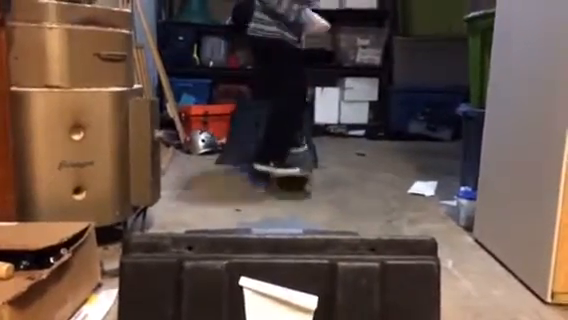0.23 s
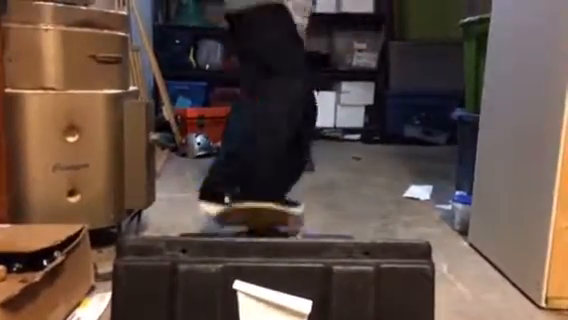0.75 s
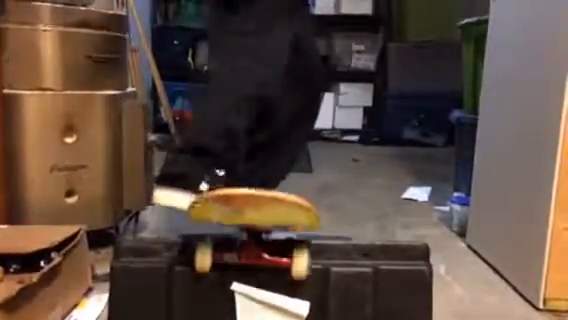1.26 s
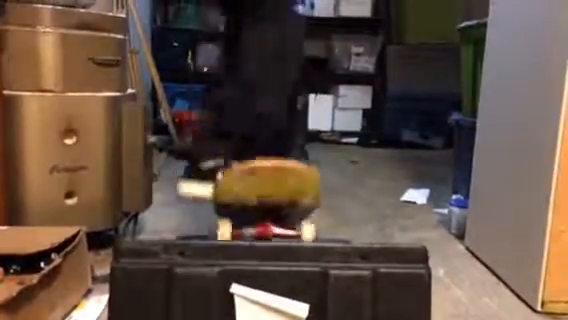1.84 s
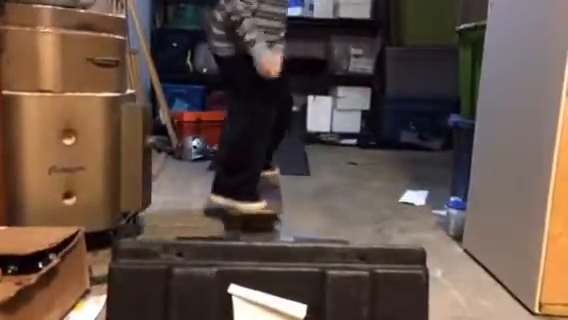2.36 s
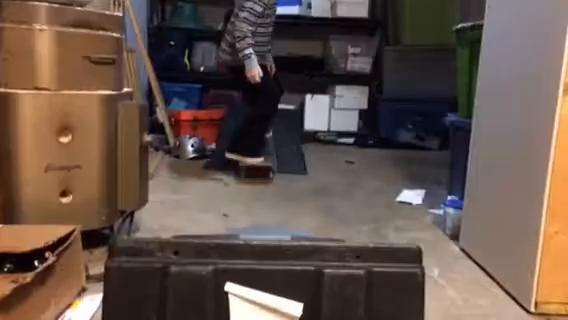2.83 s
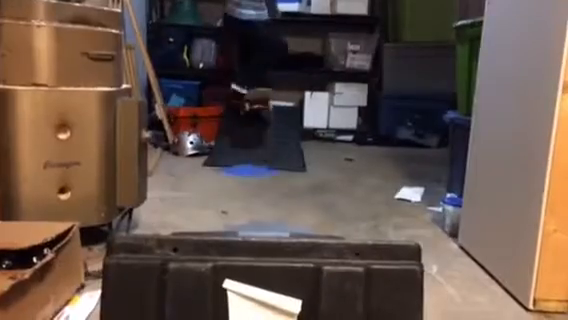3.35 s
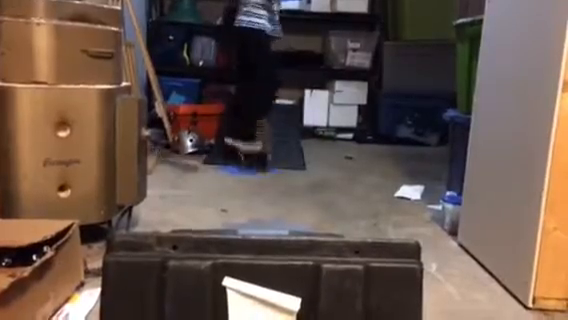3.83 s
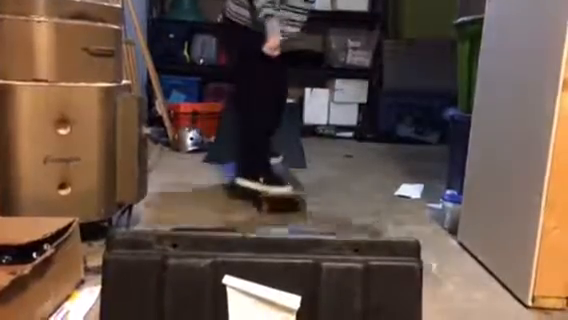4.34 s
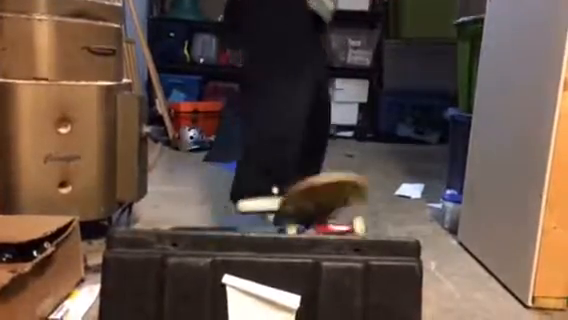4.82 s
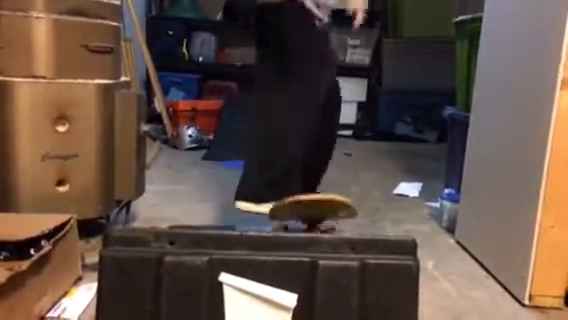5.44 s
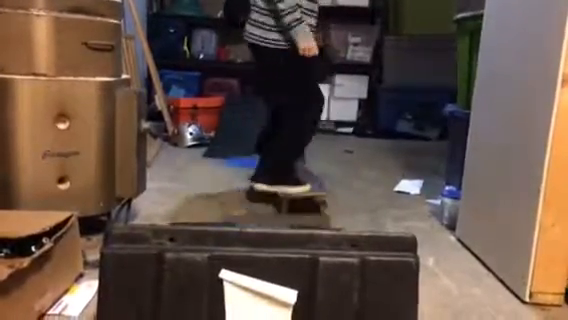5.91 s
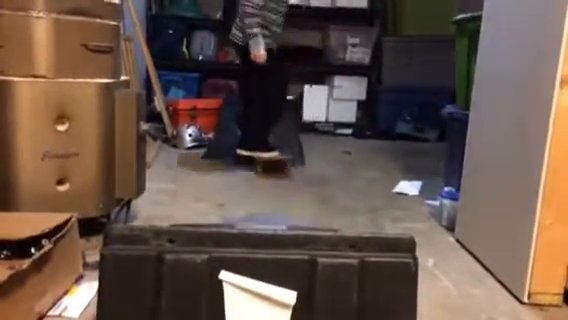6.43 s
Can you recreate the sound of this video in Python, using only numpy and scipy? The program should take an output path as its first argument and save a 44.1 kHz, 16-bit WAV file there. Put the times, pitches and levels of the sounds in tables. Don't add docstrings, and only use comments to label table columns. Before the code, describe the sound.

A skateboard rumbles across a concrete storeroom floor, clacking sharply and booming on a hollow plastic ramp close by, with gritty shoe scuffs between.

```python
import sys
import numpy as np
from scipy import signal
from scipy.io import wavfile
from scipy.ndimage import uniform_filter1d

SR = 44100
rng = np.random.default_rng(int(sys.argv[2]) if len(sys.argv) > 2 else 0)


def gain_from_db(level_db):
    decades = np.asarray(level_db, float) / 20
    return 10 ** decades


def pcm_store(signal):
    levels = np.round(np.clip(np.atleast_2d(signal), -1, 1) * 32767)
    wavfile.write(sys.argv[1], SR, levels.astype(np.int16).T)


N = 294147

# [t/s, level/dB]
AIR = [(0, -68.5), (.5, -70), (1.12, -75), (1.46, -65), (1.53, -84), (1.6, -77), (1.7, -66), (2.15, -75),
       (2.66, -71), (3.3, -67), (3.82, -73), (4.45, -72), (5.05, -72), (5.55, -68), (6.67, -64)]
# [from t/s, to t/s, deck rumble level/dB, floor shake relative level/dB]
LOADS = [(0, 0.193, -29.5, -6.5), (.4, .63, -52, -7), (0.745, 0.985, -28.5, -1), (1.144, 1.235, -37.5, 4),
         (1.42, 1.514, -51.5, -2), (1.842, 1.997, -32.5, 5), (2.047, 2.403, -26.5, -5.5),
         (2.553, 2.8, -46.5, -19), (2.988, 3.083, -26.5, -5), (3.12, 3.273, -49, 6),
         (3.806, 4.185, -39.5, -7), (4.53, 4.66, -39.5, -28), (4.74, 4.807, -22.5, -5),
         (4.856, 4.91, -31.5, 1), (5.531, 5.596, -34.5, 11.5), (5.65, 5.834, -35, 2),
         (6.1, 6.366, -50.5, -26), (6.526, 6.667, -44, -14)]
LOAD_RISE_DB_S, LOAD_FALL_DB_S, SHAKE_REST_DB = 173, 108, -65
# [t/s, level/dB]
WHEEL_RUN = [(0, -35.5), (.35, -46.5), (.8, -33.5), (1.22, -55.5), (1.45, -78), (1.62, -65), (1.72, -56),
             (2.36, -36), (2.53, -61), (2.79, -30.5), (3.07, -45), (3.4, -76), (4.14, -39), (4.35, -47),
             (4.79, -35), (5.3, -74), (5.75, -34), (6.08, -46), (6.67, -48.5)]
# [f/Hz, width/Hz, level/dB]
FLOOR_MODES = [(61, 130, -4.5), (94.3, 19.4, -1)]
# [f/Hz, width/Hz, level/dB]
HOLLOW_MODES = [(113, 27.5, -2), (148.7, 15, 2.5), (207.4, 54.5, -2), (238.4, 48, -2), (311.7, 51, -3)]
# [f/Hz, width/Hz, level/dB]
WHEEL_MODES = [(301, 107, 0), (513, 50, 9), (610.4, 33, 10), (748, 46, 9), (945, 96, 3.5),
               (1175, 236, -0.5), (1740, 490, -8)]
# [from t/s, to t/s, level/dB]
SCUFFS = [(0, 0.032, -44), (0.174, 0.36, -52.5), (0.628, 0.66, -40), (0.85, 0.88, -45),
          (0.91, 0.925, -47.5), (0.946, 0.97, -43), (1.37, 1.4, -46), (1.42, 1.448, -51),
          (1.698, 1.713, -39.5), (1.943, 2.03, -53), (2.336, 2.6, -58), (2.72, 2.94, -56),
          (2.97, 3.2, -48.5), (3.362, 3.41, -48.5), (3.458, 3.59, -42.5), (3.685, 3.71, -53),
          (3.94, 3.3, -59), (3.986, 4.382, -48.5), (4.543, 4.75, -46), (4.841, 4.92, -39.5),
          (5.238, 5.43, -44.5), (5.659, 5.77, -37.5), (5.856, 6.01, -55), (6.09, 6.275, -46.5),
          (6.32, 6.35, -51.5), (6.63, 6.9, -43.5)]
SCUFF_RISE_DB_S, SCUFF_FALL_DB_S, BEARING_DB = 291, 267, -29
# [f/Hz, width/Hz, level/dB]
GRIT_BANDS = [(1800, 1470, 5), (2470, 210, 4), (3100, 370, 3), (3950, 810, 2.5), (5460, 1000, 0),
              (6060, 1400, -4.5), (8000, 2500, -26), (11800, 3600, -14.5)]
# [t/s, peak level/dB, f/Hz]
FLOOR_BOOMS = [(0.001, -18.5, 163.5), (0.102, -20, 138.4), (0.13, -16.5, 137.6), (0.281, -21.5, 148.5),
               (0.569, -30, 155), (2.817, -11.5, 137), (2.964, -30, 114), (3.033, -9, 136.7),
               (3.455, -15.5, 149.7), (3.519, -17, 84), (3.701, -31.5, 127), (3.812, -27, 116),
               (3.916, -28, 127), (3.988, -8.5, 132.4), (4.099, -29, 143), (4.19, -23, 149),
               (4.292, -34.5, 131), (4.487, -42, 149), (5.995, -32.5, 149), (6.421, -13.5, 138),
               (6.615, -24.5, 116)]
# [t/s, peak level/dB, f/Hz]
RAMP_BOOMS = [(0.652, -11, 139.7), (0.831, -12.5, 151.4), (0.868, -13.5, 146), (1.041, -20, 155.7),
              (1.07, -15.5, 112.7), (1.213, -14, 89), (1.244, -10.5, 90.7), (1.28, -6.5, 82),
              (1.304, -8, 161), (1.651, -4, 141), (1.777, -20, 92), (1.841, -13, 175.5), (1.874, -9, 151.4),
              (1.963, -10.5, 111.6), (2.12, -20, 129), (2.261, -22.5, 89.4), (2.432, -13.5, 137.3),
              (4.62, -9, 118), (4.744, -44, 156), (4.822, -14, 124.3), (5.107, -13, 99.5),
              (5.18, -12.5, 73.3), (5.471, -30, 109), (5.51, -31, 79.4), (5.585, -19, 82),
              (5.645, -18.5, 80), (5.914, -20.5, 95)]
BOOM_FADE_S, SOFTER_LONGER = 0.036, 0.12
# [t/s, crack peak level/dB, deck knock relative level/dB, bright tick relative level/dB, hardness/dB]
CLACKS = [(0.0014, -21, 1.5, -27, 7.5), (0.1298, -16, -4, -6.5, -3.5), (0.2919, -12.5, -7.5, -6.5, 3.5),
          (0.652, -15, 8.5, -17, 4), (0.826, -15.5, 8, -15, 0.5), (1.1976, -15.5, 0.5, -12, -6.5),
          (1.275, -14.5, -1.5, -10.5, 2.5), (1.6442, -10.5, -3, -7, 7), (1.8434, -15, -3, -8.5, 4),
          (1.966, -25.5, 2, -5.5, 8.5), (2.269, -12.5, -0.5, -12, 2), (2.45, -9, -2, -11, 2),
          (2.8095, -10.5, -3, -4, 3), (3.0311, -19, -11, 2, 7.5), (3.059, -19.5, -5, -3, 4),
          (3.4499, -4.5, -12, -21, 2.5), (3.985, -3.5, -6.5, -5.5, 3.5), (4.1898, -8, -6, -10.5, -6),
          (4.6193, -13, 5, -21, 0), (4.822, -18.5, 5.5, 0, 2.5), (5.0976, -22.5, 2.5, -10.5, 3),
          (5.1747, -23.5, -2, -3.5, 6.5), (5.6872, -18, 2, -9.5, 4.5), (6.4124, -13.5, 1, -6.5, -7.5)]
# [t/s, crack peak level/dB, deck knock relative level/dB, bright tick relative level/dB]
TAPS = [(0.1174, -17, 0.5, -6.5), (0.2623, -28, 6, -12), (0.278, -25.5, 5, -8), (1.0333, -29, 4, -15),
        (1.066, -29, 3, -16), (0.812, -32, 0, -2), (1.1765, -22, -5, 0.5), (1.2486, -25, 11, 3.5),
        (1.8365, -14.5, -2, -2), (1.9492, -21.5, -30, -26), (2.2394, -24, 11, -13), (2.4189, -24, 5, -13),
        (2.7556, -27.5, 5, -14), (2.966, -38, 10, -3), (3.0184, -17, 4.5, -13), (3.2829, -34.5, -12, -7),
        (3.537, -35, 10.5, -17), (3.425, -26.5, -11, -1), (3.677, -45.5, -13, 10), (3.7025, -40.5, 0, -2),
        (3.9779, -29, 3, -8), (4.3024, -19.5, -1, -17), (4.633, -25.5, -14, 9), (4.791, -26.5, 16.5, -15),
        (4.232, -24.5, -8, -7), (4.33, -30, -1, -12), (4.815, -27, 5, -8), (5.4455, -50, 13, -15),
        (5.9239, -26.5, 7.5, -8), (5.9452, -12.5, -5.5, -8.5), (5.957, -21.5, -9, -1), (6.0, -26, -12, -10),
        (6.3664, -31, -1, -15)]
FLICKS = [
    (1.0315, -28.5, 0, -1),
    (1.043, -30.5, 3, 0),
    (1.0624, -28, 1, 0),
    (1.7804, -24, -8, -5),
    (5.1474, -27, -9, -1),
    (3.934, -48, 0, 6),
    (3.5, -49, 0, 1),
    (3.492, -27, 0, 4),
]
CLACK_T60_S, TAP_T60_S, FLICK_T60_S = 0.23, 0.17, 0.067
TAP_HARD_DB, FLICK_HARD_DB = -3.5, 0
# [f/Hz, width/Hz, level/dB]
DECK_MODES = [(371, 155, -2), (519.6, 69, 2.5), (539, 34.6, 2.5), (700, 113, 4.5), (754, 305, 1.5),
              (980, 338, -3)]
# [f/Hz, width/Hz, level/dB]
TRUCK_MODES = [(1059, 69, 7), (1310, 210, 8), (1566, 253, 8.5), (1937, 480, 3.5), (2317, 60, 7.5),
               (2670, 730, -2.5), (3100, 130, -26), (3500, 230, -17)]
# [f/Hz, width/Hz, level/dB]
TICK_MODES = [(4200, 2920, 1.5), (8000, 15000, -5.5), (13600, 2860, -3)]
# [t/s, peak level/dB, f/Hz, fade/s]
SNAPS = [(0.1287, -36, 8790, 0.002), (0.1314, -18, 1530, 0.0022), (0.2931, -10, 1305, 0.002),
         (0.2938, -21, 8800, 0.002), (0.6525, -9, 950, 0.0022), (0.682, -20, 950, 0.002),
         (0.828, -9.5, 1190, 0.0026), (1.1969, -30, 11970, 0.002), (1.199, -16, 1380, 0.0022),
         (1.2738, -34, 6890, 0.002), (1.277, -11, 930, 0.0018), (1.6453, -35, 11630, 0.002),
         (1.651, -15, 3000, 0.0031), (1.658, -14, 1710, 0.002), (1.8434, -26, 7040, 0.002),
         (1.8444, -16, 2150, 0.002), (1.8548, -17.5, 3790, 0.0022), (2.2412, -15.5, 1120, 0.0022),
         (2.2483, -14, 960, 0.0022), (2.271, -14, 1380, 0.0021), (2.4498, -22, 7150, 0.0022),
         (2.4546, -23, 1120, 0.0017), (2.8131, -14, 3820, 0.002), (2.814, -29, 10250, 0.002),
         (2.8203, -35, 9730, 0.002), (3.0321, -12, 3770, 0.0022), (3.0326, -36, 11200, 0.002),
         (3.0622, -18, 4480, 0.002), (3.4498, -16, 4740, 0.002), (3.4498, -10, 1670, 0.0018),
         (3.4502, -35, 10680, 0.002), (3.9845, -28, 10770, 0.002), (3.986, -9, 1920, 0.002),
         (3.9955, -9, 1380, 0.002), (4.1906, -19, 1890, 0.002), (4.3042, -24, 1890, 0.002),
         (4.634, -16, 6030, 0.0024), (4.6382, -13, 960, 0.002), (4.6407, -22, 7300, 0.0023),
         (4.8226, -18, 5940, 0.0025), (4.822, -21, 1030, 0.002), (4.828, -17, 6940, 0.0022),
         (5.1745, -32, 11710, 0.002), (5.176, -20, 1210, 0.002), (5.1759, -30, 5300, 0.002),
         (5.6961, -15, 945, 0.002), (5.9455, -13, 1260, 0.0023), (5.9559, -29, 12100, 0.0022),
         (5.9597, -12, 1380, 0.0022), (6.416, -19.5, 4600, 0.0023)]
SNAP_CYCLES = 7
# [t/s, peak level/dB, f/Hz, fade/s]
PLIES = [(1.29, -19.5, 400, 0.023), (1.325, -28, 350, 0.013), (2.457, -21.5, 560, .03),
         (4.5, -37, 190, 0.056), (4.555, -31, 200, 0.059), (4.7925, -15, 620, .003),
         (5.22, -28.5, 301, .018), (3.453, -21.5, 2900, .012), (3.47, -24, 3140, .01),
         (4.194, -25.5, 2350, .014), (4.24, -32, 2590, .012), (4.304, -32, 2160, 0.011),
         (5.99, -31, 1900, .015), (5.975, -27, 1480, 0.021), (5.95, -24, 1230, .025),
         (5.957, -34, 3710, 0.016)]
# [t/s, peak level/dB, f/Hz, fade/s]
RINGS = [(0.13, -27, 1054, 0.024), (0.292, -11.5, 642, 0.023), (0.651, -15.5, 463, 0.041),
         (0.826, -27, 421, 0.044), (1.198, -30, 544, 0.053), (1.271, -8, 726, 0.012),
         (1.644, -19, 690, 0.0085), (1.842, -7.5, 406, 0.013), (2.269, -16.5, 461, 0.049),
         (2.454, -10.5, 956, 0.016), (2.812, -14, 560, 0.032), (3.032, -16, 700, 0.027),
         (3.987, -29, 1120, 0.014), (4.197, -10.5, 730, 0.022), (4.301, -23, 873, 0.017),
         (4.62, -14, 448, 0.016), (4.821, -2.5, 451, 0.012), (5.174, -10.5, 952, 0.0069),
         (5.687, -13, 463, 0.0098),
         (0.2922, -11, 1300, 0.019), (1.1987, -22, 1294, 0.018) , (1.6437, -18, 1745, 0.029),
          (2.4514, -18, 1370, 0.035), (3.4496, -26, 1584, 0.03), (3.9833, -21, 1650, 0.03),
          (4.1904, -16, 1870, 0.018), (5.9454, -19, 1300, 0.015), (3.458, -17, 2500, 0.01),
          (4.215, -22, 745, .04), (6.414, -36, 5500, .008), (2.125, -17, 370, 0.034),
          (4.303, -26, 800, .025)]
# [t/s, peak level/dB, f/Hz, fade/s]
THUMPS = [(0.651, -7, 285, 0.036), (0.688, -2.5, 223, 0.007), (0.804, -7.5, 255, 0.021),
          (0.834, -4.5, 240.6, 0.025), (1.216, -7, 228.4, 0.021), (1.274, -4, 201, 0.027),
          (1.648, -4.5, 232, 0.007), (1.842, -4.5, 189, 0.03), (2.049, -20.5, 223, 0.042),
          (2.12, -15.5, 226.6, 0.035), (2.223, -14, 193, 0.014), (2.248, -5, 225, 0.012),
          (2.273, 0, 264.5, 0.012), (2.294, -6.5, 240, 0.019), (2.341, -4, 228, 0.013),
          (2.454, -11.5, 346, 0.018), (2.816, -14.5, 310.3, 0.05), (3.033, -12.5, 320, 0.042),
          (3.182, -28, 401, 0.019),
          (3.526, -19, 225, 0.021), (3.988, -11, 310, 0.037), (4.035, -18.5, 285, 0.037),
                (4.622, -9, 435, 0.03), (4.639, -2, 269, 0.018), (4.791, -16, 265, 0.023),
                (4.821, -6, 206.7, 0.027), (5.103, -17, 210, 0.033), (5.182, -14, 190, 0.025),
                (5.548, -20, 323, 0.013), (5.58, -16.5, 220, 0.034), (5.662, -9.5, 279.7, 0.019),
                (5.688, -8, 273, 0.015), (5.846, -16, 274, 0.074), (5.918, -11.5, 326, 0.025),
                (6.451, -17.5, 195.6, 0.03)]
# [from t/s, to t/s, level/dB, f/Hz]
SPINS = [(1.365, 1.4, -59, 2340), (1.36, 1.46, -58, 3000), (1.1, 1.46, -57, 3700), (3.4, 3.42, -53, 2000),
         (3.56, 3.58, -54, 7000), (4.5, 4.55, -58, 4000), (4.87, 4.97, -55, 2280), (4.87, 4.97, -54, 3000),
         (5.27, 5.43, -55.5, 1880), (5.24, 5.34, -56, 2830), (5.3, 5.45, -51, 3940),
         (5.26, 5.36, -53, 5140), (5.26, 5.37, -55, 5300), (5.25, 5.37, -54, 6090), (6.09, 6.12, -54, 5000),
         (6.1, 6.26, -53.5, 4090), (6.12, 6.2, -53, 4450), (6.1, 6.26, -56, 3470), (6.2, 6.27, -56, 2350),
         (6.2, 6.26, -65, 6230)]
SPIN_WIDTH_HZ, SPIN_EDGE_DB_S = 140, 450


def body(x, modes):
    out = 0
    for k, (hz, width, db) in enumerate(modes):
        b, a = signal.iirpeak(hz, hz / max(width, 5.), fs=SR)
        out = out + (-1) ** k * gain_from_db(db) * signal.lfilter(b, a, x)
    return out


def unit(x):
    return x / np.sqrt(np.mean(x ** 2))


def walk(rate):
    k = int(SR / rate)
    held = np.repeat(rng.standard_normal(N // k + 1), k)
    return uniform_filter1d(uniform_filter1d(held, k), k)[:N]


def add(out, s, x):
    i = max(int(s * SR), 0)
    out[i:i + len(x)] += x[:N - i]


def level_line(table):
    return np.interp(np.arange(N) / SR, *np.transpose(table))


def spells(start, end, db, rise, fall):
    t = np.arange(0, N / SR + .01, .002)[:, None]
    slopes = rise * np.maximum(start - t, 0) + fall * np.maximum(t - end, 0)
    top = np.max(db - slopes, axis=1)
    return gain_from_db(np.interp(np.arange(N) / SR, t[:, 0], top))


def grains(rate, spread_db, smooth):
    hit = rng.random(N) < rate / SR
    size = gain_from_db(spread_db * np.minimum(rng.exponential(size=N), 3.5))
    return unit(hit * size * rng.standard_normal(N)) + smooth * rng.standard_normal(N)


def hush():
    return gain_from_db(-66) * unit(body(rng.standard_normal(N), [(150, 100, -3.5), (1260, 380, -1)]))


def air():
    hiss = unit(body(rng.standard_normal(N), [(4000, 5000, -2), (12000, 10000, 0)]))
    return hiss * gain_from_db(level_line(AIR) + 1.4 * walk(25))


def wheel_run():
    return gain_from_db(level_line(WHEEL_RUN))


def rolling():
    start, end, db, shake = np.transpose(LOADS)
    flicker = [gain_from_db(2.5 * walk(25)) for _ in range(3)]
    floor_load = spells(start, end, db + shake, LOAD_RISE_DB_S, LOAD_FALL_DB_S) + gain_from_db(SHAKE_REST_DB)
    deck_load = spells(start, end, db, LOAD_RISE_DB_S, LOAD_FALL_DB_S)
    floor = body(body(grains(80, 1.0, 0.79), FLOOR_MODES), [(73, 160, 0)])
    deck = body(body(grains(150, 3.9, 0.93), HOLLOW_MODES), HOLLOW_MODES)
    wheels = body(body(grains(900, 2, .9), WHEEL_MODES), [(790, 7400, 0)])
    layers = np.array([unit(floor) * floor_load, unit(deck) * deck_load, unit(wheels) * wheel_run()])
    return np.sum(layers * flicker, axis=0)


def scuffing():
    bands = 0
    for mode in GRIT_BANDS:
        mottle = gain_from_db(3.5 * walk(14))
        bands = bands + body(grains(2500, 1.5, 1.5), [mode]) * mottle
    hiss = signal.sosfilt(signal.butter(4, 1500, "high", fs=SR, output="sos"), bands)
    soles = spells(*np.transpose(SCUFFS), SCUFF_RISE_DB_S, SCUFF_FALL_DB_S)
    return unit(hiss) * (soles + gain_from_db(BEARING_DB) * wheel_run())


def beating_modes(table, swell, apart, below_db, above_db, bend, trim_db):
    t, out = np.arange(SR // 2) / SR, np.zeros(N)
    chance = rng.random((len(table), 5))
    rise = 1 - np.exp(-(t / swell) ** 2)
    share = gain_from_db(np.array([[0], [below_db], [above_db]]))
    for (s, db, hz, fade), c in zip(table, chance):
        ratio = 1 + apart * np.array([[0], [-1 - c[0] / 2], [1 + c[1]]])
        phase = c[2:, None]
        ring = np.sum(share * np.sin(2 * np.pi * (hz * ratio * t + phase)), axis=0)
        fall = np.exp(-(t / max(fade, .008)) ** bend)
        add(out, s, gain_from_db(db + trim_db) * ring * rise * fall)
    return out


def booms():
    table = [(*b, BOOM_FADE_S * gain_from_db(-SOFTER_LONGER * b[1])) for b in sorted(RAMP_BOOMS + FLOOR_BOOMS)]
    return beating_modes(table, 0.0015, 0.214, -7.0, -9.5, 1.49, -1.17)


def blows():
    clacks = [(*c, CLACK_T60_S) for c in CLACKS]
    taps = [(*c, TAP_HARD_DB, TAP_T60_S) for c in TAPS]
    flicks = [(*c, FLICK_HARD_DB, FLICK_T60_S) for c in FLICKS]
    return np.transpose(clacks + taps + flicks)


def strikes(db, stretch, click_db, direct_db, direct_s, fill_s, bend):
    t, out = np.arange(SR // 2) / SR, np.zeros(N)
    rough = gain_from_db(np.resize(1.8 * walk(200) + 3 * walk(700), N + SR))
    noise = rng.standard_normal(N + SR) * rough
    for (s, _, _, _, hard, t60), level in zip(blows().T, db):
        fill = 1 - np.exp(-t / (fill_s * gain_from_db(-hard)))
        tail = fill * np.exp(-np.log(1000) * (t / (stretch * t60)) ** bend)
        burst = gain_from_db(direct_db + hard) * np.exp(-t / direct_s)
        blow = (burst + tail) * noise[int(s * SR):][:len(t)]
        blow[0] += gain_from_db(click_db + hard)
        add(out, s, gain_from_db(level) * blow)
    return out


def knocks():
    _, crack, deck, tick, *_ = blows()
    white = rng.standard_normal(SR)
    out = 0
    # (resonances, level dB, tail stretch, click dB, burst dB, burst s, echo fill s, bend of the decay)
    for modes, db, *shape in (
            (DECK_MODES, crack + deck - 12, .95, 22, -3, .006, .005, 1.2),
            (TRUCK_MODES, crack - 13, .95, 18, -1, .003, .005, 1.1),
            (TICK_MODES, crack + tick - 12, .85, 9, 1, .002, .005, .95)):
        out = out + body(strikes(db, *shape), modes) / np.std(body(white, modes))
    return out


def snaps():
    t, out = np.arange(SR // 3) / SR, np.zeros(N)
    damped = [(s, db, hz, min(fade, SNAP_CYCLES / hz)) for s, db, hz, fade in SNAPS]
    for s, db, hz, fade in damped + PLIES:
        shape = (1 - np.exp(-t / .0004)) * np.exp(-t / np.clip(fade, .0004, .06))
        add(out, s, gain_from_db(db + 0.5) * np.sin(2 * np.pi * hz * t) * shape)
    return out


def rings():
    return beating_modes(RINGS, 0.00075, 0.037, -3.4, -4.0, 0.8, -10)


def thumps():
    return beating_modes(THUMPS, 0.0014, 0.1857, -4, -6.5, 1.0, -4.5)


def spinning():
    noise = rng.standard_normal(N) * gain_from_db(1.7 * walk(40))
    out = 0
    for k, (start, end, db, hz) in enumerate(SPINS):
        band = unit(body(np.roll(noise, k * SR // 7), [(hz, SPIN_WIDTH_HZ, 0)]))
        out = out + band * spells(np.array([start]), end, db, SPIN_EDGE_DB_S, SPIN_EDGE_DB_S)
    return out


def scene():
    ground = hush() + air() + rolling() + scuffing()
    board = booms() + knocks() + snaps() + rings() + thumps() + spinning()
    return (ground + board)[None]


def low_pass(x):
    return signal.sosfilt(signal.butter(12, 16480, fs=SR, output="sos"), x)


def record(dry):
    x = signal.sosfilt(signal.butter(2, 58, "high", fs=SR, output="sos"), dry)
    x = np.tanh(0.77 * x) / 0.61
    x = signal.sosfilt(signal.ellip(8, .2, 30, 15300, fs=SR, output="sos"), x)
    return low_pass(x)


dry = scene()
out = record(dry)
pcm_store(out)
```